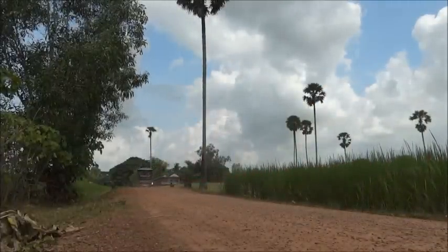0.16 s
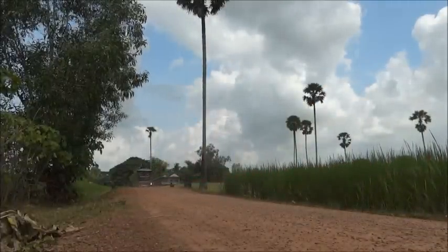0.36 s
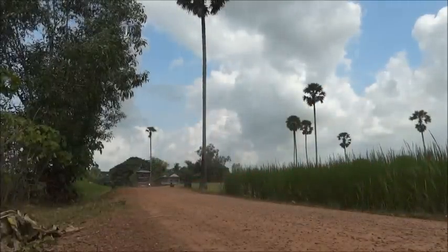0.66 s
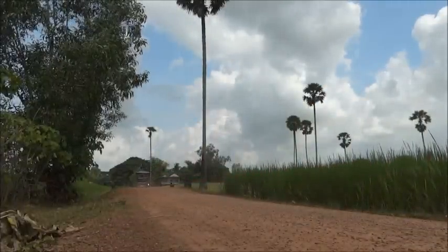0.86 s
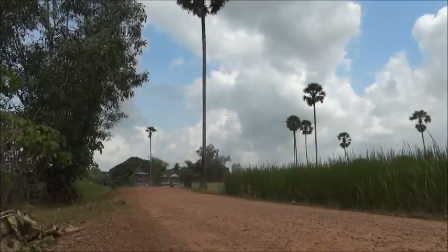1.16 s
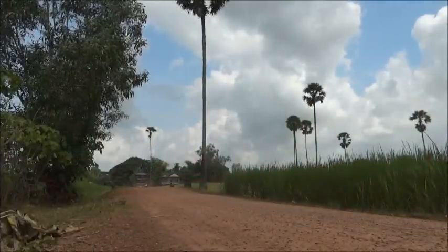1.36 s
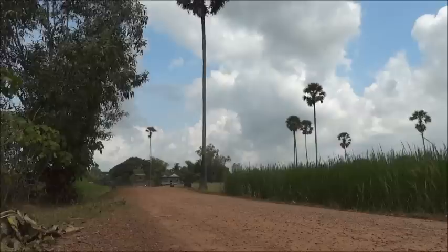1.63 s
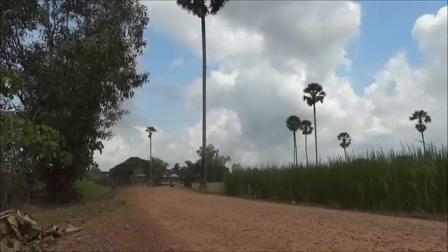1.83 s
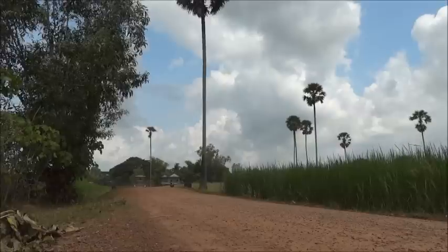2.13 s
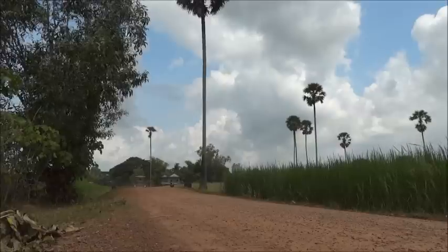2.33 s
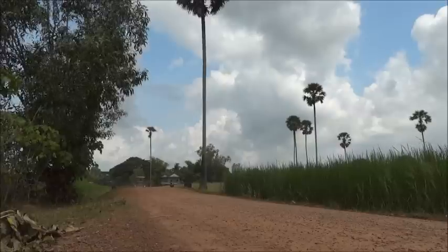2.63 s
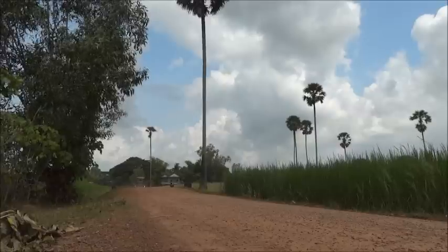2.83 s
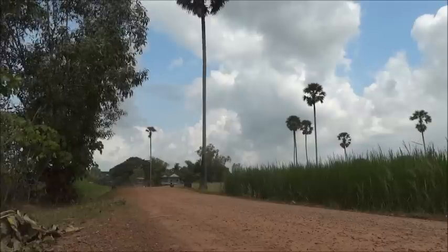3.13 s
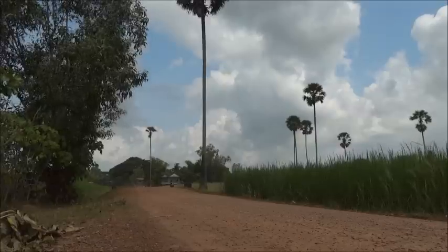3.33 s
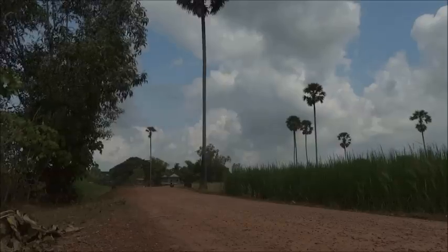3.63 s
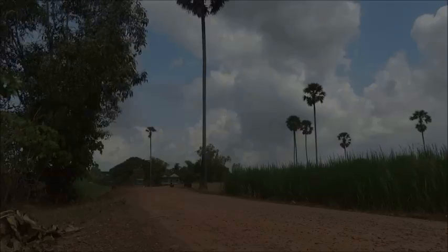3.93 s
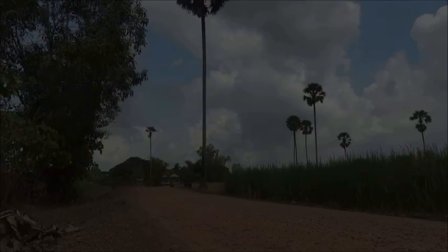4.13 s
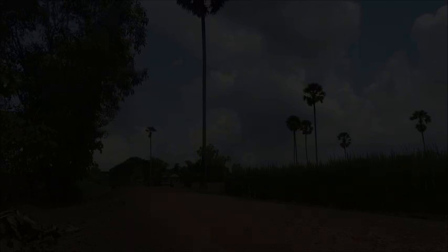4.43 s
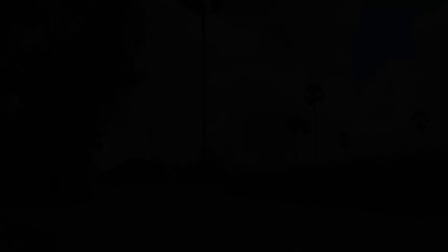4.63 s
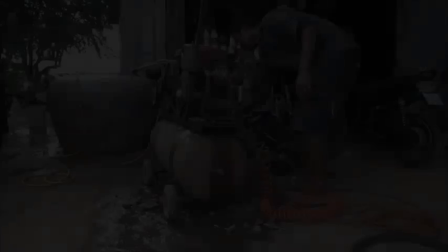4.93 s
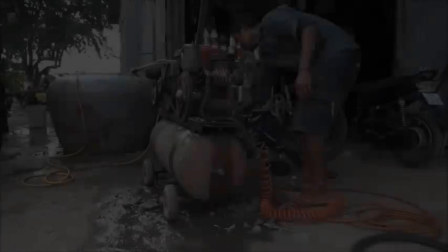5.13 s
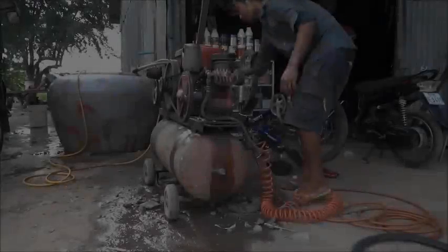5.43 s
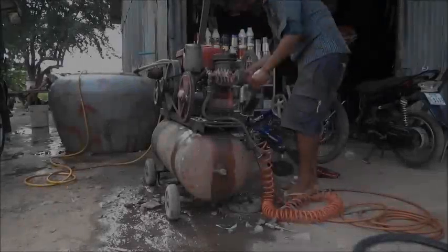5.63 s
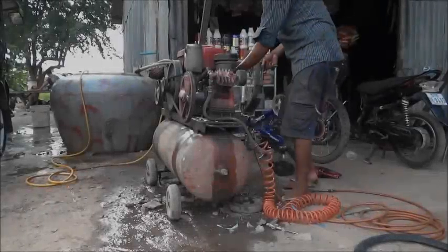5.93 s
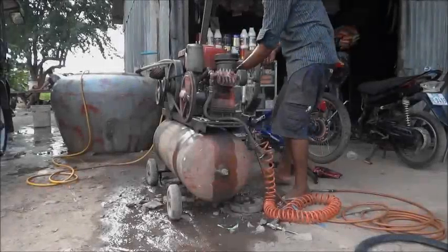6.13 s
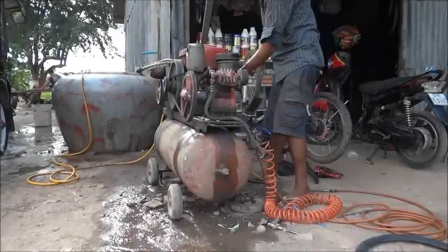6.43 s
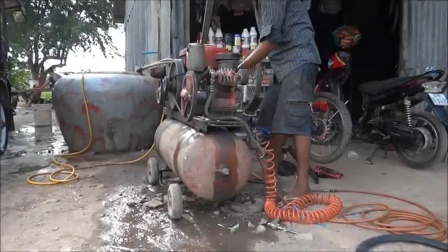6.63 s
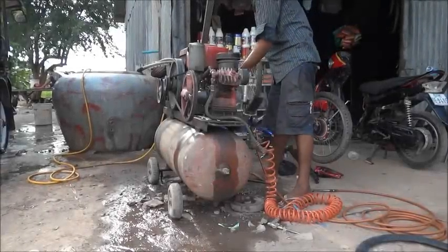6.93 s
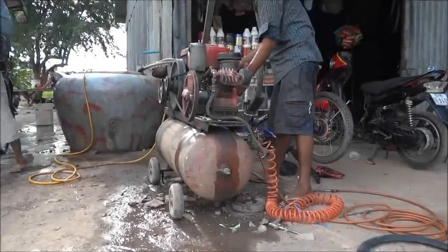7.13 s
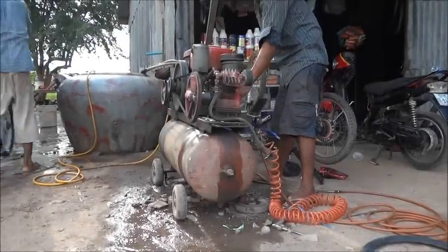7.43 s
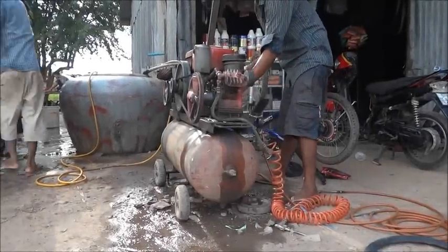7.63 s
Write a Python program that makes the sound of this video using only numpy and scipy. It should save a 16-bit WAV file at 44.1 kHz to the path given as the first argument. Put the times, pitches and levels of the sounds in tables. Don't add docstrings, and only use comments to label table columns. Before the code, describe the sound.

Lumpy wind rumble, strongest in the middle of the first part, covers faint bird chirps, soft leaf hiss and a far puttering motor with trailer knocks, heard from the roadside. It cuts to short silence. Then, abruptly and close to the microphone, a compressor-like engine throbs steadily with casing roar and hiss, scattered metallic clanks, and a rattling panel that grows louder.

```python
import sys
import numpy as np
from scipy import signal
from scipy.io import wavfile

SR = 44100
rng = np.random.default_rng(int(sys.argv[2]) if len(sys.argv) > 2 else 0)


def materialize(psi):
    bounded = np.clip(np.atleast_2d(psi).T, -1, 1)
    quanta = np.round(bounded * 32767).astype(np.int16)
    wavfile.write(sys.argv[1], SR, quanta)


def boost_factor(decibels):
    exponent = np.asarray(decibels, float) / 20
    return 10 ** exponent


N = 343539
ROAD_END_S, YARD_START_S = 4.855, 5.325
FIRST_FIRING_S = 5.3590

# time_s, gust_db
GUST_LEVEL = [(0.0, -19), (0.07, -23.5), (0.27, -24), (0.3, -21.5), (0.32, -26), (0.57, -23), (0.62, -18.5),
              (0.67, -28.5), (0.77, -27.5), (0.92, -20), (1.05, -31), (1.62, -30.5), (1.65, -21),
              (1.69, -39), (1.74, -24), (1.84, -27), (1.96, -16.5), (2.04, -17.5), (2.12, -17.5),
              (2.15, -22.5), (2.17, -15.5), (2.23, -22), (2.3, -13), (2.43, -20.5), (2.47, -18),
              (2.5, -18.5), (2.61, -17.5), (2.66, -27.5), (2.69, -18), (2.73, -16), (2.8, -23),
              (3.05, -14.5), (3.12, -15.5), (3.15, -19.5), (3.19, -18), (3.23, -24.5), (3.27, -19.5),
              (3.31, -24.5), (3.35, -15.5), (3.48, -15.5), (3.62, -27.5), (3.78, -21), (3.85, -28.5),
              (3.94, -21.5), (4.05, -32.5), (4.19, -38.5), (4.21, -29), (4.27, -28), (4.3, -26),
              (4.4, -32.5), (4.44, -31), (4.5, -33), (4.54, -37), (4.58, -32), (4.66, -32), (4.84, -33),
              (4.85, -45)]
# pitch_hz, level_db_per_hz
GUST_SPECTRUM = [(15, -43.5), (25, -12.5), (87, 4.5), (156, 5), (245, -9.5), (318, -12), (477, -30.5),
                 (738, -45.5), (868, -42), (1200, -86), (1560, -71.5), (2640, -120)]
# start_s, peak_db, pitch_hz
EDDIES = [
    (1.989, -16.5, 249),
    (2.296, -9, 168.4),
    (2.331, -3.5, 294),
    (2.46, -9.5, 193),
    (2.611, -14, 200),
    (2.692, -14, 169),
    (3.07, -15, 200),
    (3.44, -6.5, 200),
]
# time_s, firings_per_s, exhaust_db, body_clatter_db
FAR_VEHICLE = [(0, 26.8, -46.5, -43), (.45, 27.3, -64, -54), (.8, 27.8, -36.5, -43.5),
               (1.2, 28.5, -37.5, -45), (1.8, 29.3, -38, -48.5), (2.3, 29.8, -43.5, -56.5),
               (3, 30.4, -41, -52.5), (3.6, 30.9, -48.5, -60), (4.2, 31.2, -58, -60.5),
               (4.85, 31.4, -64, -61)]
# pitch_hz, width_hz, level_db
FAR_PIPE_MODES = [(145, 40, -2), (260, 40, -2), (335, 50, 0), (430, 60, -4), (530, 60, -11)]
# pitch_hz, width_hz, level_db
FAR_BODY_MODES = [(650, 90, -1), (887, 42, 4.5), (1090, 50, -1), (1363, 68, 3), (1574, 130, -5)]
# pitch_hz, level_db, t60_s
HORN_PARTIALS = [(416, -52, 0.19), (583, -36, .3), (873, -30, 0.13), (1650, -44, .2)]
# start_s, peak_db
TRAILER_KNOCKS = [
    (0.5068, -20),
    (0.7597, -19),
    (1.1847, -26),
]
# pitch_hz, level_db, t60_s
TRAILER_MODES = [(700, -15, .025), (890, -2, .035), (1100, -1.5, 0.04), (1390, 0.5, .04), (1610, 0, .04),
                 (1850, 2, 0.0083), (2040, -5, 0.018)]
# start_s, length_s, from_hz, to_hz, level_db
CHIRPS = [(.01, 0.039, 3880, 2800, -35), (0.165, 0.028, 3240, 2540, -36), (.27, .06, 4970, 3760, -44),
          (.484, 0.019, 4400, 3900, -36), (.695, .025, 5700, 5230, -41), (1.399, .045, 4500, 3330, -35),
          (1.516, 0.063, 2950, 3960, -37), (1.53, .08, 4230, 5000, -41), (1.438, .03, 3200, 2600, -45),
          (1.597, 0.05, 4000, 2750, -36), (2.053, 0.036, 3240, 4050, -38), (2.073, .025, 5900, 3640, -34),
          (2.085, 0.033, 3800, 3210, -35), (2.078, .08, 6000, 6200, -39), (2.131, 0.051, 4000, 2600, -37),
          (2.223, .03, 3010, 3630, -38), (2.258, 0.04, 3800, 3220, -37), (3.003, .025, 5850, 5620, -42),
          (3.02, .04, 3300, 2800, -38), (3.93, 0.056, 5040, 2900, -36), (3.985, 0.026, 4340, 3600, -39),
          (4.045, 0.058, 6200, 2700, -41)]
# time_s, level_db
LEAF_LEVEL = [(0.0, -38.5), (0.67, -38.5), (1.84, -40), (2.29, -39.5), (2.62, -41), (4.48, -47),
              (4.65, -47)]
# pitch_hz, level_db_per_hz
FIELD_SPECTRUM = [(120, -24.5), (200, -4), (328, -5.5), (527, -10), (656, -8), (774, -14.5), (848, -29.5),
                  (1220, -19.5), (1930, -22), (9300, -19), (14700, -37.5), (15800, -47.5)]
# pitch_hz, likeness_0_to_1
ROAD_LIKENESS = [(60, 1), (180, 0.62), (550, 0.64), (1650, 0.7), (4970, 0.93), (15000, 0.93)]

# time_s, firings_per_s, puff_db
ENGINE_IDLE = [(5.33, 38.7, -17), (5.6, 38.3, -16.5), (5.75, 37.8, -16.5), (5.91, 37.6, -16),
               (6.07, 37.2, -16), (6.4, 37.07, -17.5), (6.56, 36.85, -18.5), (6.88, 36.6, -19.5),
               (7.05, 36.75, -20), (7.37, 37.0, -22), (7.79, 37.2, -23)]
# pitch_hz, level_db, t60_s, polarity_sign, delay_s
PIPE_MODES = [(400, 4, .0095, 1, 0), (790, -13, .04, 1, 0), (365, -17, .1, 1, 0), (600, -17, .05, -1, 0),
              (75, -19, .2, -1, .001), (150, -10.5, .12, -1, .001), (187, -10.5, .12, -1, .001)]
# time_s, roar_db, pan_db
CASING_LEVEL = [(5.34, -16, -3.5), (5.55, -19, -4), (6.09, -18.5, 0), (6.4, -18.5, 1), (6.91, -20.5, -2.5),
                (6.94, -18.5, 3), (6.95, -18.5, -5.5), (7.3, -24, -5), (7.65, -16.5, -2), (7.68, -18, -4.0),
                (7.71, -21, -5), (7.77, -18.5, -4.0), (7.79, -22, -3)]
# pitch_hz, level_db_per_hz
CASING_SPECTRUM = [(25, -34), (45, -16), (75, -5), (140, -1.5), (250, 1.5), (420, -1.5), (620, 0.5),
                   (900, -5), (1500, -11.5), (2500, -19.5), (4000, -21), (6000, -34)]
# time_s, level_db
PANEL_LEVEL = [(5.33, -42), (6.4, -34), (6.7, -26), (7.0, -23), (7.15, -21), (7.3, -20.5), (7.45, -18),
               (7.6, -22), (7.79, -17.5)]
# pitch_hz, width_hz, level_db
PANEL_MODES = [(900, 60, -1), (970, 60, -1), (1090, 70, 0), (1200, 90, -2), (1450, 200, -7)]
# start_s, peak_db, low_part_db, top_part_db, pan_db, scatter_s
TOOL_CLANKS = [(5.3604, -17.5, 11.5, 8, -7, 0.017), (5.5487, -16, 9.5, -7, -3.5, 0.023),
               (6.0646, -6, 0.5, -2.5, 0.0, 0.019), (6.1894, -18, -7, 7, -1, 0.017),
               (6.2884, -9.5, -8, 0, -0.5, 0.02), (6.318, -11.5, 5, -18, 5.5, 0.021),
               (6.7191, -16, 0, 0, 5.5, 0.017), (6.7494, -30, 0, 5, 15, 0.017),
               (6.8456, -7, 2, -1, 0, 0.017), (6.9094, -28, 0, 10, 0.5, 0.017),
               (6.9894, -14.5, -3, 0, 4, 0.017), (7.1531, -16.5, 10, -5, 6, 0.017),
               (7.259, -17.5, 16, -14.5, -2.5, 0.019), (7.5125, 4, 6.5, -11.5, -0.5, 0.016)]
# start_s, pitch_hz, level_db, t60_s
STEEL_PINGS = [(5.79, 10083, -36, .05), (5.855, 8700, -30, .05), (5.905, 8460, -28.5, .06),
               (5.905, 10083, -38, .05), (6.067, 8580, -23, 0.054), (6.067, 3540, -19, 0.064),
               (6.321, 10083, -31, 0.36), (6.384, 10083, -26, 0.13), (6.45, 10083, -32, .1),
               (6.32, 7480, -24, .05), (6.745, 13540, -33, .05), (6.99, 10900, -35, .05),
               (6.99, 13300, -36, .05), (7.16, 3510, -21.5, 0.082), (7.16, 1090, -10, 0.093),
               (7.514, 1090, -7.5, 0.066), (7.514, 2600, -12, 0.05), (7.514, 3400, -12, 0.049),
               (7.514, 6660, -20, 0.081), (7.514, 11400, -33, .07), (7.514, 13540, -34, .06)]
# time_s, level_db
YARD_HISS_LEVEL = [(5.33, -26), (5.55, -27), (5.8, -34.5), (6.4, -29.5), (6.9, -30), (7.4, -29),
                   (7.79, -32.5)]
# pitch_hz, level_db_per_hz
YARD_HISS_SPECTRUM = [(1180, -38), (2000, 9.5), (2570, -2.5), (3600, -18), (4590, -7), (7510, -6),
                      (8630, -6.5), (13900, -29), (15800, -54)]
# pitch_hz, likeness_0_to_1
YARD_LIKENESS = [(60, 1), (180, 0.86), (550, 0.79), (1650, 0.82), (4970, 0.87), (15000, 0.72)]


def rms_one(x):
    return x / np.sqrt(np.mean(x ** 2) + 1e-20)


def in_time(rows):
    s, *columns = np.transpose(rows)
    return [np.interp(np.arange(N) / SR, s, column) for column in columns]


def at_hz(points, hz):
    points = np.array(points)
    return np.interp(np.log(hz), np.log(points[:, 0]), points[:, 1])


def drift(rate_hz):
    r = np.exp(-80 * np.pi * rate_hz / SR)
    white = rng.standard_normal(N // 40 + 2002)
    slow = signal.lfilter([1], [1, -2 * r, r * r], white)[2000:]
    return np.interp(np.arange(N) / 40, np.arange(len(slow)), rms_one(slow))


def band(x, low_hz, high_hz):
    return signal.sosfilt(signal.butter(2, [low_hz, high_hz], "band", fs=SR, output="sos"), x)


def resonate(x, modes):
    out = 0
    for k, (hz, width_hz, db) in enumerate(modes):
        r = np.exp(-np.pi * width_hz / SR)
        poles = [1, -2 * r * np.cos(2 * np.pi * hz / SR), r * r]
        mode = signal.lfilter([(1 - r * r) / 2, 0, (r * r - 1) / 2], poles, x)
        out = out + (-1) ** k * boost_factor(db) * mode
    return out


def ring(clicks, hz, t60_s):
    r, w = boost_factor(-60 / (t60_s * SR)), 2 * np.pi * hz / SR
    return signal.lfilter([0, np.sin(w)], [1, -2 * r * np.cos(w), r * r], clicks + 1e-18)


def banded_noise(spectrum, likeness, patchy_db, flicker_hz):
    out = 0
    edges_hz = 20 * 2 ** np.arange(0, 10, .5)
    white, together = rng.standard_normal((2, 2, N)), drift(flicker_hz / 2)
    for k, (low, high) in enumerate(zip(edges_hz, np.append(edges_hz[1:], 19000))):
        hz = np.sqrt(low * high)
        if spectrum[0][0] < high and low < spectrum[-1][0]:
            mid, side = band(white[k % 2], low, high)
            alike = np.clip(at_hz(likeness, hz), 0, .99)
            gain = boost_factor(at_hz(spectrum, hz) + patchy_db * (together + drift(flicker_hz)))
            out = out + gain * (np.sqrt(1 + alike) * mid + np.sqrt(1 - alike) * side * [[1], [-1]])
    return rms_one(out)


def firings(per_s, first_s, jitter, spread_db):
    turns = np.cumsum(per_s) / SR
    turns = turns - turns[round(first_s * SR)] + jitter * drift(6)
    clicks = np.diff(np.floor(turns), prepend=0) > 0
    return clicks * boost_factor(spread_db * rng.standard_normal(N)), turns % 1


def spread(x, pan_db, wet_db):
    tail = rng.standard_normal((2, 2600)) * boost_factor(-60 * np.arange(2600) / 2600)
    wet = signal.fftconvolve(x[None], band(tail, 130, 7000) / 20, axes=1)[:, :N]
    return x * boost_factor(np.outer([.5, -.5], pan_db)) + boost_factor(wet_db) * wet


def wind():
    gust_db, = in_time(GUST_LEVEL)
    rumble = banded_noise(GUST_SPECTRUM, ROAD_LIKENESS, patchy_db=1.5, flicker_hz=30.0)
    dull = signal.sosfilt(signal.butter(2, 115, fs=SR, output="sos"), rumble)
    strong = np.clip((gust_db + 29) / 16, 0, 1)
    return boost_factor(gust_db) * (dull + strong * (rumble - dull))


def thumps():
    out, u = np.zeros(N), np.arange(2000) / SR
    for s, db, hz in EDDIES:
        at = round(s * SR)
        swell = u * hz * np.exp(-1.1 * u * hz)
        out[at:at + len(u)] += boost_factor(db + 2) * np.sin(2 * np.pi * hz * u) * swell
    return spread(out, [0.5], wet_db=-2.0)


def trailer():
    knocks = np.zeros(N)
    for s, db in TRAILER_KNOCKS:
        at = round(s * SR)
        knocks[at:at + 400] = boost_factor(db - 29) * rng.standard_normal(400) * boost_factor(-np.arange(400) / 16)
    ringing = sum(boost_factor(db) * ring(knocks, hz, t60_s) for hz, db, t60_s in TRAILER_MODES)
    return ringing + 5.0 * band(band(knocks, 700, 2300), 600, 2600)


def horn():
    toot = np.arange(N) == 0
    return sum(boost_factor(db) * ring(toot, hz, t60_s) for hz, db, t60_s in HORN_PARTIALS)


def vehicle():
    per_s, pipe_db, body_db = in_time(FAR_VEHICLE)
    clicks, cycle = firings(per_s, 0, jitter=.004, spread_db=1.0)
    exhaust = boost_factor(pipe_db) * rms_one(band(resonate(clicks, FAR_PIPE_MODES), 80, 550))
    shake = (.6 + .7 * np.exp(-3.0 * cycle)) * boost_factor(1.2 * drift(15))
    clatter = boost_factor(body_db) * rms_one(resonate(rng.standard_normal(N) * shake, FAR_BODY_MODES))
    return spread(clatter + trailer() + horn(), [0.5], wet_db=-2.5) + spread(exhaust, [0.5], wet_db=-9.0)


def birds():
    out = np.zeros(N)
    waver_hz = 230 * rms_one(band(rng.standard_normal(N), 60, 600))
    for s, length_s, from_hz, to_hz, db in CHIRPS:
        u, at = np.linspace(0, 1, int(length_s * SR)), int(s * SR)
        pitch_hz = from_hz + (to_hz - from_hz) * u + waver_hz[at:at + len(u)]
        whistle = np.sin(2 * np.pi * np.cumsum(pitch_hz) / SR)
        out[at:at + len(u)] += boost_factor(db - 8) * np.sqrt(np.sin(np.pi * u) + 1e-9) * whistle
    return spread(out, [0.5], wet_db=4.0)


def leaves():
    leaf_db, = in_time(LEAF_LEVEL)
    return boost_factor(leaf_db + 1.5) * banded_noise(FIELD_SPECTRUM, ROAD_LIKENESS, patchy_db=.25, flicker_hz=8.0)


def engine():
    per_s, puff_db = in_time(ENGINE_IDLE)
    roar_db, pan_db = in_time(CASING_LEVEL)
    clicks, _ = firings(per_s, FIRST_FIRING_S, jitter=.004, spread_db=1.2)
    puff = 0
    for hz, db, t60_s, sign, delay_s in PIPE_MODES:
        puff = puff + sign * boost_factor(db) * ring(np.roll(clicks, round(delay_s * SR)), hz, t60_s)
    puff = boost_factor(puff_db + 1.5) * rms_one(band(puff, 38, 1300))
    roar = banded_noise(CASING_SPECTRUM, YARD_LIKENESS, patchy_db=1.2, flicker_hz=5.8)
    roar = boost_factor(roar_db + 2 + np.outer([.5, -.5], pan_db)) * roar
    return spread(puff, [0.5], wet_db=-15.0) + roar


def panel():
    buzz_db, = in_time(PANEL_LEVEL)
    taps_per_s = 1200 * boost_factor(4.0 * drift(20))
    taps = (rng.random(N) < taps_per_s / SR) * rng.standard_normal(N)
    buzz = rms_one(band(resonate(taps, PANEL_MODES), 690, 1800))
    return spread(boost_factor(buzz_db) * buzz, [-7.0], wet_db=-6.0)


def clanks():
    out, u = np.zeros((2, N + 6000)), np.arange(6000) / SR
    for s, db, low_db, top_db, pan_db, scatter_s in TOOL_CLANKS:
        at = round(s * SR)
        envelope = np.exp(-u / max(scatter_s, .002)) * np.minimum(u / .0018, 1)
        burst = rng.standard_normal(len(u)) * envelope
        low = boost_factor(low_db) * band(burst, 1800, 5000)
        middle = band(burst, 5000, 10500)
        top = boost_factor(top_db - 9) * band(band(burst, 10500, 14500), 10000, 15000)
        sides = boost_factor([[pan_db / 2], [-pan_db / 2]])
        out[:, at:at + len(u)] += boost_factor(db - 8.5) * (low + middle + top) * sides
    return out[:, :N]


def pings():
    u = np.arange(6000)
    steel = np.zeros(N + len(u))
    for s, hz, db, t60_s in STEEL_PINGS:
        at = round(s * SR)
        steel[at:at + len(u)] += boost_factor(db) * ring(u == 0, hz, t60_s)
    return spread(steel[:N], [-2.5], wet_db=-25.0)


def yard_hiss():
    hiss_db, = in_time(YARD_HISS_LEVEL)
    hiss = banded_noise(YARD_HISS_SPECTRUM, YARD_LIKENESS, patchy_db=0.83, flicker_hz=30.0)
    return boost_factor(hiss_db) * hiss


def scene():
    road = wind() + thumps() + vehicle() + birds() + leaves()
    yard = engine() + panel() + clanks() + pings() + yard_hiss()
    t = np.arange(N) / SR
    road_db = np.interp(t - ROAD_END_S, [0.0035, 0.0076, 0.067, .07], [4, -21, -35, -120])
    since_yard = t - YARD_START_S
    yard_db = np.interp(since_yard, [-0.011, 0.005, 0.02], [-44, -11, 0.5])
    yard_db = np.where(since_yard < -0.0019, -120, yard_db)
    return boost_factor(road_db) * road + boost_factor(yard_db) * yard


def band_limit(x):
    return signal.sosfilt(signal.butter(12, 15960, fs=SR, output="sos"), x)


def record(dry):
    rounded = 1.15 * np.tanh(dry / 1.15)
    top_cut = signal.ellip(10, .5, 80, 15750, fs=SR, output="sos")
    mix = signal.sosfilt(top_cut, rounded)
    return band_limit(mix)


dry = scene()
out = record(dry)
materialize(out)
```